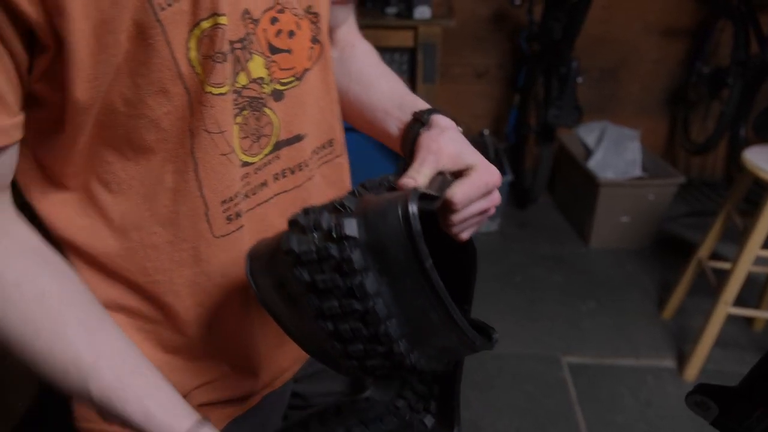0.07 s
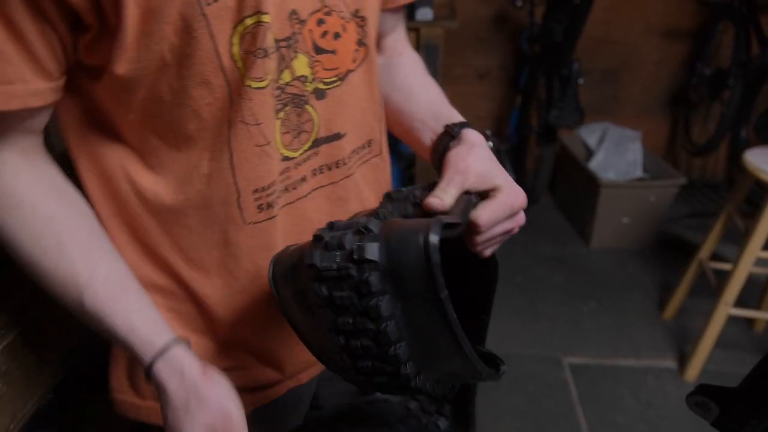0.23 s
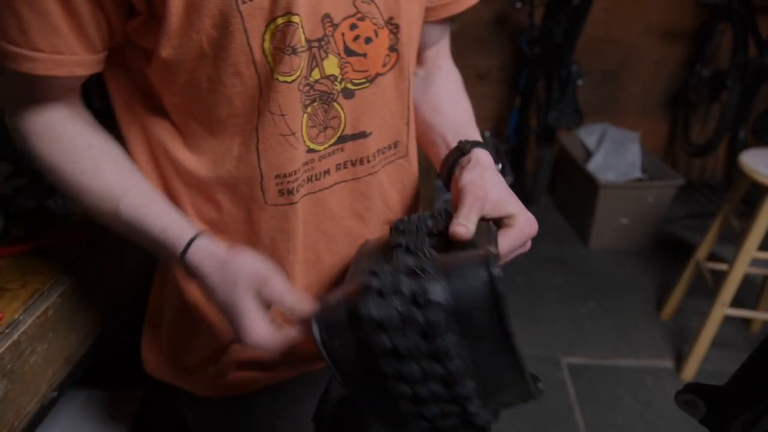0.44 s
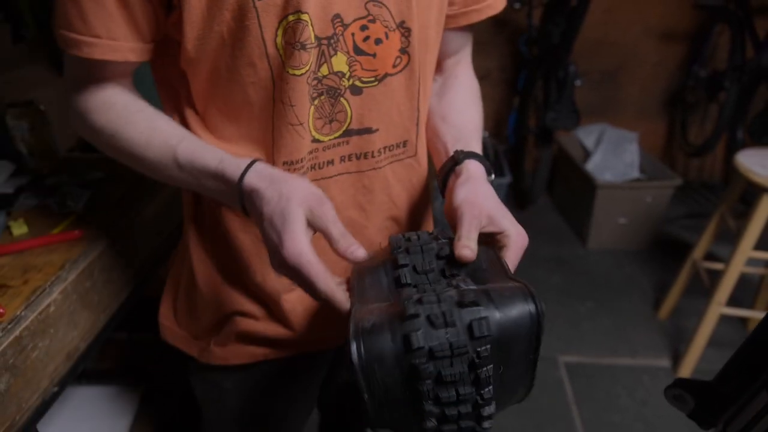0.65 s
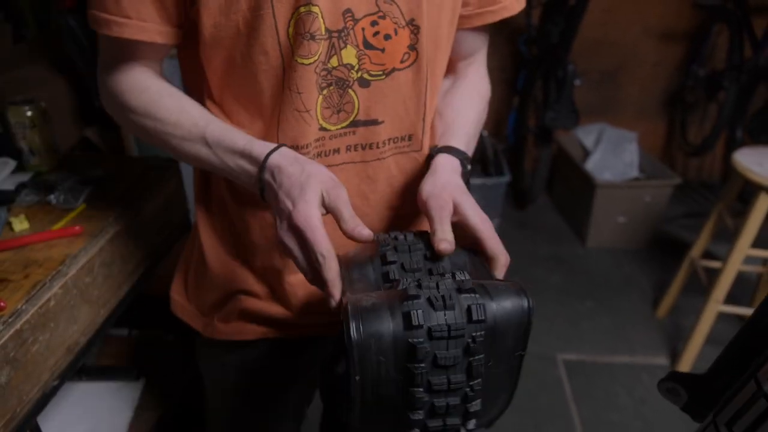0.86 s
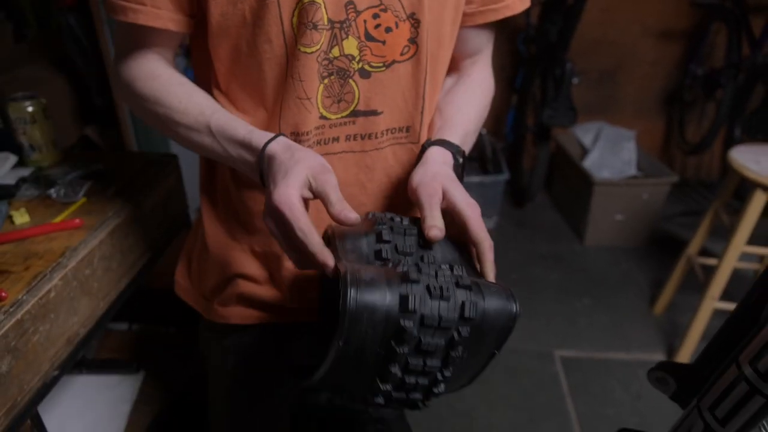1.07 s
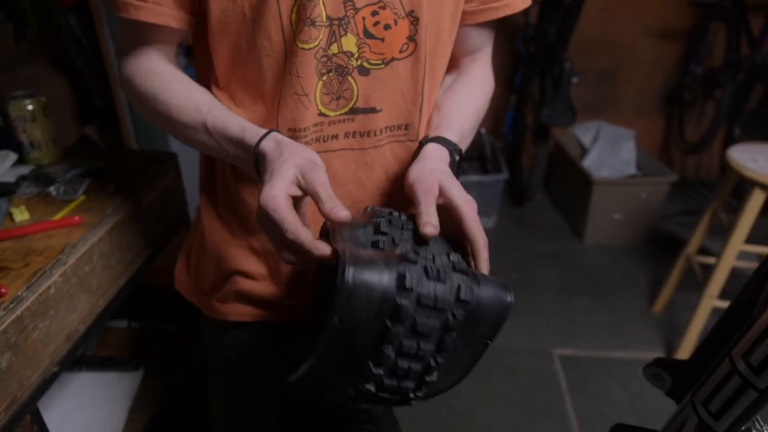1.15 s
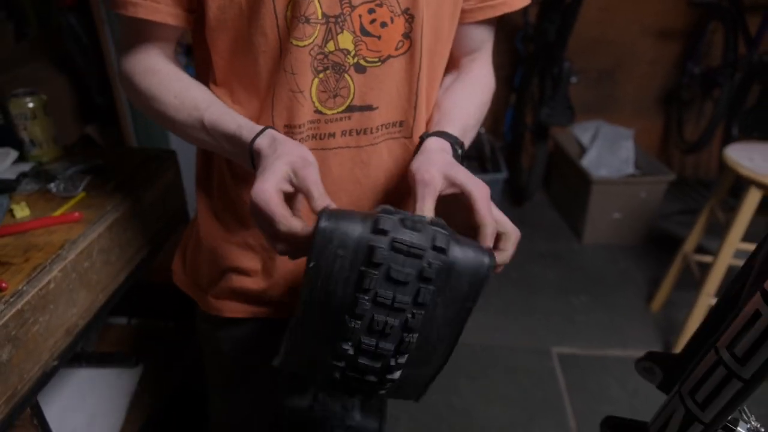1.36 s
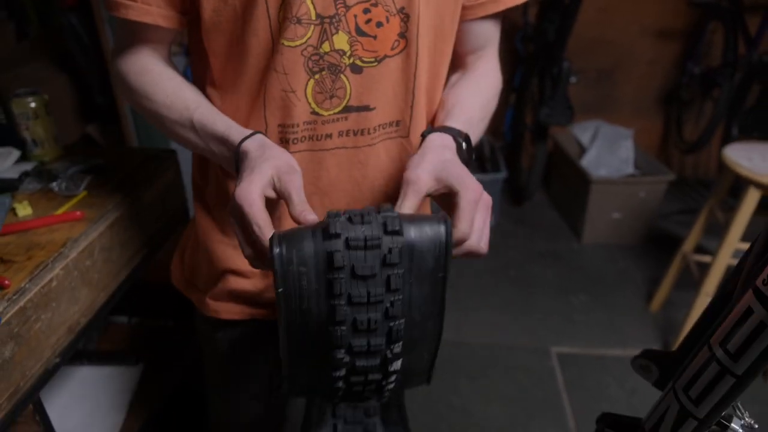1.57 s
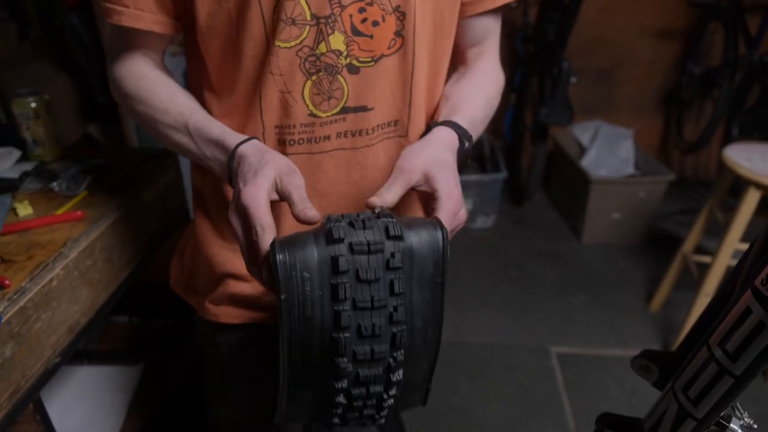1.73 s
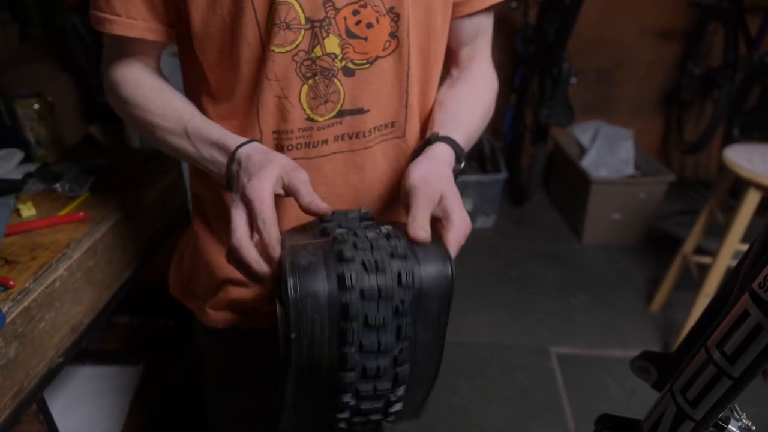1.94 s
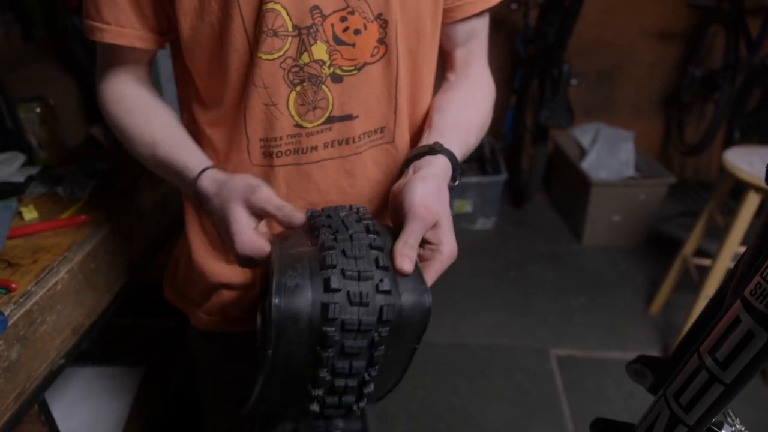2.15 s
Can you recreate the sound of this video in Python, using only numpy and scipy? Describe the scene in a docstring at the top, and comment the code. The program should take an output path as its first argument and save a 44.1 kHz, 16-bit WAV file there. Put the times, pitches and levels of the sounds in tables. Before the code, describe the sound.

One sharp, hollow slap comes from a rubber tire snapping over, close up in a quiet workshop. Afterwards hands turn it, with soft rubbing, brief finger squeaks and dull tread ticks over a faint hum.

```python
"""A small, quiet workshop, a folded rubber bike tire close in front of the microphone. A palm pats the
tire and flips it: the casing snaps through with one hollow slap, gives a low thump and flaps once more,
and the room answers from farther back. Then the hands turn it: palms brush the casing, fingers squeak
on the rubber and tread knobs tick softly. All sits centred, almost mono, over faint air and hum."""
import sys
import numpy as np
from scipy import signal
from scipy.fft import rfft, irfft, next_fast_len
from scipy.io import wavfile
from scipy.ndimage import map_coordinates

SR = 44100
rng = np.random.default_rng(int(sys.argv[2]) if len(sys.argv) > 2 else 0)


def master(y):
    """Save y as 16-bit WAV."""
    cut = np.clip(np.atleast_2d(y).T, -1, 1)
    pcm = np.round(cut * 32767)  # scale
    wavfile.write(sys.argv[1], SR, pcm.astype(np.int16))


N = 97020
T = np.arange(N) / SR

# room air at the microphone, in the middle and at the sides (frequency [Hz], level [dB])
AIR_MID = [(15, -36.5), (25, -26), (128, -2), (271, -0.5), (488, -7), (558, -5), (604, -13), (790, -5.5),
           (978, -16), (1150, -15), (1460, -16), (3540, -29), (4260, -33.5), (10900, -38.5), (15000, -42.5)]
AIR_SIDE = [(15, -65), (25, -25.5), (172, 5), (729, 6), (1420, 0), (10900, -15.5), (13800, -14.5),
            (15000, -25)]
# a palm landing on the casing (time [s], level [dB], t60 [s])
PAT = (.0505, -45.5, .07)
# palm strokes (peak time [s], rise [s], fall [s], level [dB], tilt [dB/octave])
BRUSHES = [(0.075, .03, 0.11, -58.5, 1), (0.858, 0.23, 0.19, -57, 0.7), (1.18, 0.029, 0.078, -65.5, 3.5),
           (1.245, 0.19, .12, -60.5, 2.5), (1.64, .11, 0.1, -67, -1), (1.747, 0.044, 0.024, -58, -2),
           (1.936, 0.065, 0.032, -54, -8), (2.086, 0.054, 0.041, -57.5, -3)]
# blows of the casing (time [s], ring level [dB], crack level [dB])
SLAPS = [(0.2188, -23.5, -37), (0.2214, -5.5, -25.5), (0.2483, -16.5, -35), (0.3474, -34, -47)]
# modes of the air pocket and casing in a slap (frequency [Hz], relative level [dB], t60 [s])
POCKET_MODES = [(547, -27.5, 0.0052), (802, -8.5, 0.0085), (1382, 5, 0.0095), (1620, -14.5, 0.0066),
                (2034, -8, 0.011), (3330, -30, 0.0085)]
# low modes of the whole casing (frequency [Hz], relative level [dB], t60 [s])
CASING_MODES = [(155, -6, .15), (197, 2.5, 0.11), (255, 0.5, 0.11), (335, 0, 0.13)]
# finger slips (time [s], length [s], level [dB], start pitch [Hz], end pitch [Hz])
SQUEAKS = [(0.552, 0.0091, -50, 1082, 1006), (0.809, 0.017, -49.5, 657, 830),
           (0.825, 0.011, -46.5, 520, 646), (0.839, 0.0166, -45.5, 720, 965),
           (0.859, 0.014, -50.5, 1344, 1433), (1.275, 0.016, -55.5, 1041, 1000),
           (1.467, 0.01, -57, 900, 900), (1.699, 0.0158, -56, 817, 850), (1.886, 0.02, -54, 792, 897),
           (1.906, .012, -45.5, 929, 843), (1.923, .013, -36, 718, 806), (1.93, 0.0092, -47.5, 1100, 962),
           (1.957, 0.0048, -55.5, 908, 885), (1.964, 0.0096, -49.5, 924, 985),
           (2.024, 0.0057, -50.5, 740, 740), (2.087, 0.01154, -43.5, 658.6, 880),
           (2.094, 0.0141, -51.5, 1250, 1225)]
# tread knobs and fingertips catching (time [s], level [dB], t60 [s], tilt [dB/octave])
TICKS = [(0.562, -50, 0.041, 0.35), (1.632, -58.5, .03, 1), (1.669, -50, 0.063, 0.5),
         (1.709, -64.5, 0.037, 5), (1.74, -60, 0.078, 2.5), (1.784, -56.5, 0.038, -1.5),
         (1.795, -54.5, 0.037, 1.5), (1.845, -52, .03, -1.5), (1.933, -45.5, 0.019, -1.5),
         (2.027, -50.5, .06, -3.6), (2.042, -47.5, 0.018, -2.5), (2.094, -52.5, 0.025, 3.8)]
# spectra of the contact noises, close up (frequency [Hz], level [dB])
PAT_COLOUR = [(150, -3.5), (500, -4), (850, -0.5), (1200, -10.5), (1750, 10.5), (2300, -11.5), (3300, -16),
              (5000, -30), (15000, -46)]
BRUSH_COLOUR = [(100, -13.5), (400, 1), (900, 9), (1500, 1), (2000, -0.5), (2600, -8), (3200, -8),
                (4000, -14.5), (4700, -28), (7000, -32), (15000, -46)]
CRACK_COLOUR = [(200, -18), (700, 5), (2300, 10.5), (2900, -1), (3700, 3), (4800, -11.5), (6500, -18.5),
                (10000, -26.5), (15000, -36.5)]
SCUFF_COLOUR = [(200, -13), (1000, -2), (2200, -0.5), (2850, -12.5), (3550, 3), (4300, -9), (5000, -16),
                (6500, -26), (10000, -34), (15000, -42.5)]
TICK_COLOUR = [(100, -17), (250, 2.5), (500, -2.5), (850, 5), (1400, -4), (2000, -4.5), (2600, -15),
               (3100, -9.5), (4100, -17), (4800, -28.5), (8000, -33.5), (15000, -44)]
# echoes off nearby surfaces (delay [s], level [dB])
ECHOES = [(.0066, -14), (.0083, -19.5), (0.0177, -15.5), (0.0237, -17)]
# decay of the workshop's reverberation (frequency [Hz], t60 [s])
ROOM_T60 = [(150, 0.29), (600, 0.26), (1500, 0.32), (4000, 0.34), (8000, 0.23), (15000, 0.23)]
# colour of that reverberation (frequency [Hz], level [dB])
ROOM_COLOUR = [(100, -1), (300, 6.5), (520, 1), (780, -0.5), (1020, 3), (1340, -8.5), (1700, 0), (2150, 0),
               (2700, -1), (3500, -0.5), (6000, 3.5), (15000, -0.5)]

SLAP_LOW_HZ, HANDS_LOW_HZ = 463.5, 140  # the tire radiates little below these
SLAP_ATTACK_S, TOUCH_ATTACK_S, GRAIN_DB = 0.0003, 0.00063, 2.5
ROOM_MID_DB, ROOM_SIDE_DB = -3, -57


def amp(db):
    """Decibels to gain."""
    return 10 ** (np.asarray(db) / 20)


def unit(x):
    """Scale to rms 1."""
    return x / np.sqrt(np.mean(x ** 2) + 1e-20)


def along(points, hz):
    """Read (frequency [Hz], value) points on a log axis."""
    freqs, values = np.transpose(points)
    return np.interp(np.log(hz + 1), np.log(freqs + 1), values)


def wobble(rate):
    """A smooth random curve, rate knots a second."""
    return map_coordinates(rng.standard_normal(int(N * rate / SR) + 4), [T * rate])


def filtered(x, response):
    """Pass x through a gain given as a function of frequency."""
    size = next_fast_len(N + SR // 2)
    return irfft(rfft(x, size) * response(np.fft.rfftfreq(size, 1 / SR)), size)[..., :N]


def low_cut(x, hz):
    """Fourth-order high-pass."""
    return signal.sosfilt(signal.butter(4, hz, "highpass", fs=SR, output="sos"), x)


def noise(colour, tilt_db=0):
    """Coloured noise of rms 1, tilted by tilt_db an octave."""
    def response(hz):
        return amp(along(colour, hz) + tilt_db * np.log2(np.maximum(hz, 100)))
    return unit(filtered(rng.standard_normal(N), response))


def struck(start, attack, t60):
    """Envelope of a blow: quick rise, exponential decay."""
    age = np.maximum(T - start, 0)
    return (1 - np.exp(-age / attack)) * amp(-60 * age / t60)


def stroke(peak, rise, fall, db):
    """Envelope of a slide, 20 dB down at rise seconds before its peak and fall seconds after."""
    return amp(db - 20 * np.maximum((peak - T) / rise, (T - peak) / fall))


def ring(start, modes, attack):
    """Damped modes set going by one blow."""
    return sum(amp(db) * struck(start, attack, t60) * np.sin(2 * np.pi * hz * (T - start))
               for hz, db, t60 in modes)


def room_tone(air_db=-64.5, hum_hz=70.8, hum_db=-77.5):
    """Steady air noise and a faint wavering hum around the microphone."""
    hum_level = amp(hum_db + 1.6 * wobble(4.8))
    hum = hum_level * np.sin(2 * np.pi * hum_hz * T + 0.5 * wobble(8))
    return amp(air_db) * noise(AIR_MID) + hum


def pat():
    """A palm lands on the tire with a short burst of noise, just before the flip."""
    start, db, t60 = PAT
    return amp(db) * struck(start, TOUCH_ATTACK_S, t60) * noise(PAT_COLOUR)


def brushes():
    """Palms slide over the casing with grainy friction."""
    friction = sum(stroke(peak, rise, fall, db) * noise(BRUSH_COLOUR, tilt_db)
                   for peak, rise, fall, db, tilt_db in BRUSHES)
    return friction * unit(amp(GRAIN_DB * wobble(390)))


def slaps():
    """Rubber claps on rubber: each blow cracks and rings hollow, and a grainy scuff trails the loudest."""
    scuff = stroke(peak=0.251, rise=0.008, fall=0.03, db=-34.5) * noise(SCUFF_COLOUR)
    out = scuff * unit(amp(GRAIN_DB * wobble(500)))
    for start, ring_db, crack_db in SLAPS:
        out += amp(crack_db) * struck(start, SLAP_ATTACK_S, t60=0.045) * noise(CRACK_COLOUR)
        out += amp(ring_db) * ring(start, POCKET_MODES, SLAP_ATTACK_S)
    return low_cut(out, SLAP_LOW_HZ)


def thump(start=0.2515, db=-45.5):
    """The whole casing flaps into its new shape and its low modes ring."""
    return amp(db) * ring(start, CASING_MODES, attack=0.0022)


def squeaks(jitter=0.08, rough_db=2.1, release_s=0.00057):
    """Skin sticks and slips on rubber: an unsteady tone swells, glides and lets go."""
    out = np.zeros(N)
    drift = 1 + jitter * wobble(400)
    roughness = amp(rough_db * wobble(310))
    for start, length, db, start_hz, end_hz in SQUEAKS:
        progress = np.clip((T - start) / length, 0, 1)
        pitch_hz = (start_hz + (end_hz - start_hz) * progress) * drift
        phase = 2 * np.pi * np.cumsum(pitch_hz) / SR
        overtones = sum(amp(-24 - 5 * k) * np.sin((k + 2) * phase) for k in range(3))
        swell = progress ** 0.62
        release = np.clip((start + length - T) / release_s + 0.5, 0, 1)
        out += amp(db) * swell * release * (np.sin(phase) + overtones)
    return out * roughness


def ticks():
    """Knobs and fingertips catch and come free with dull, dead ticks."""
    return sum(amp(db) * struck(start, TOUCH_ATTACK_S, t60) * noise(TICK_COLOUR, tilt_db)
               for start, db, t60, tilt_db in TICKS)


def early_echoes(x):
    """Bench, floor and walls throw weak, delayed copies back to the microphone."""
    return filtered(x, lambda hz: sum(amp(db) * np.exp(-2j * np.pi * hz * delay) for delay, db in ECHOES))


def room_tail(x, build_s=0.00676):
    """Diffuse answer from farther back in the workshop, each frequency dying at its own speed."""
    hz, age, spectra = signal.stft(rng.standard_normal(SR // 2), SR, nperseg=256)
    decay = amp(-60 * age / along(ROOM_T60, hz)[:, None])
    _, tail = signal.istft(spectra * decay, SR, nperseg=256)
    tail *= 1 - np.exp(-(T[:len(tail)] / build_s) ** 2)
    wet = signal.fftconvolve(x, tail / np.linalg.norm(tail))[:N]
    return filtered(wet, lambda hz: amp(along(ROOM_COLOUR, hz)))


def scene():
    """The tire close and centred, with only a trace of reverberation and air at the sides."""
    flip = slaps() + thump()
    hands = low_cut(pat() + squeaks() + brushes() + ticks(), HANDS_LOW_HZ)
    into_room = flip + amp(-7) * hands  # the hands excite the room less than the slap does
    room = early_echoes(into_room) + amp(ROOM_MID_DB) * room_tail(into_room)
    mid = flip + hands + room + room_tone()
    side = amp(ROOM_SIDE_DB) * room_tail(into_room) + amp(-79) * noise(AIR_SIDE)
    return np.array([mid + side, mid - side])


def record(dry):
    """At the microphone: nothing above 15.6 kHz is kept."""
    return filtered(dry, lambda hz: hz < 15600)


dry = scene()
out = record(dry)
master(out)
```